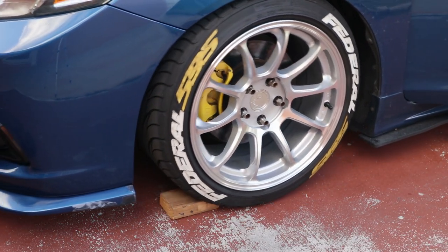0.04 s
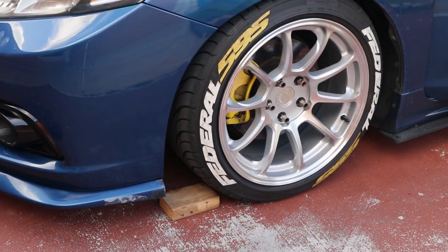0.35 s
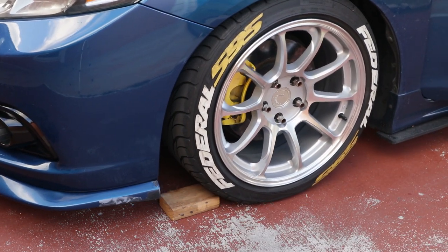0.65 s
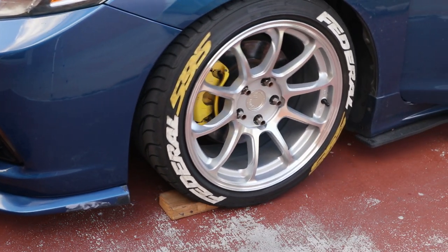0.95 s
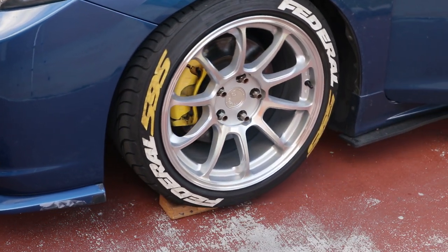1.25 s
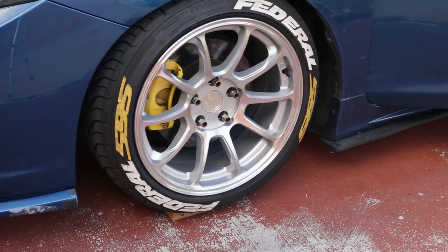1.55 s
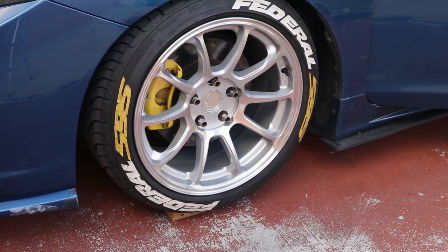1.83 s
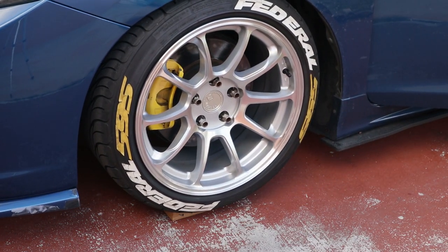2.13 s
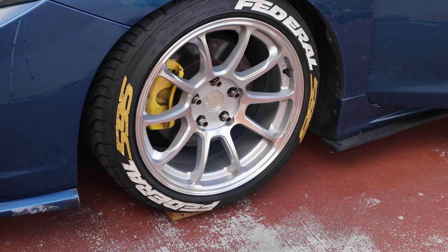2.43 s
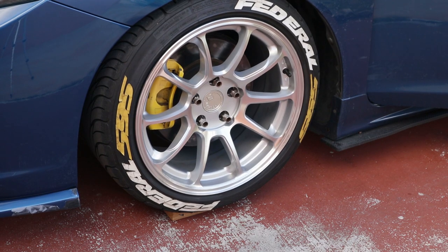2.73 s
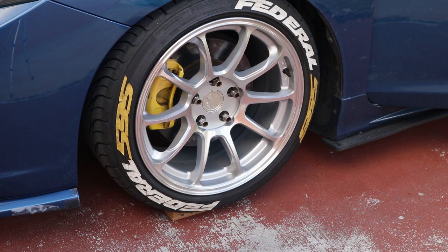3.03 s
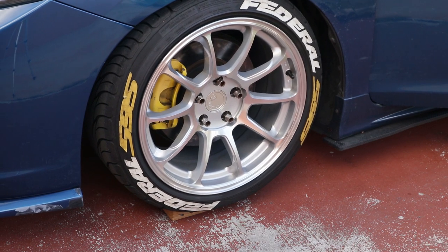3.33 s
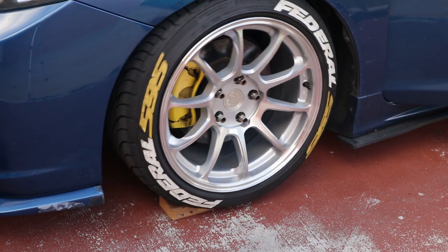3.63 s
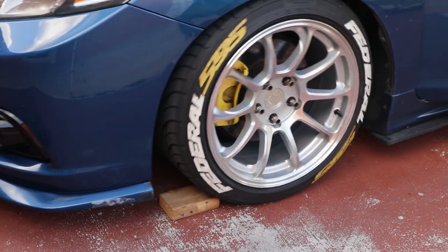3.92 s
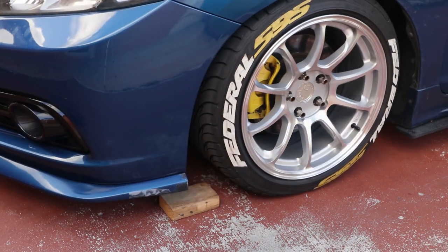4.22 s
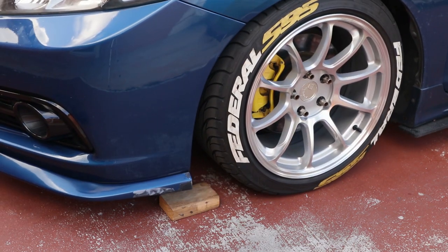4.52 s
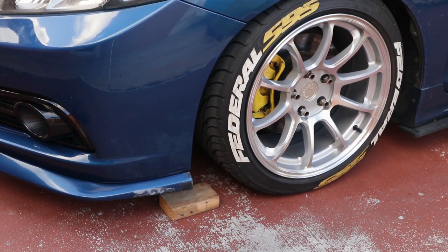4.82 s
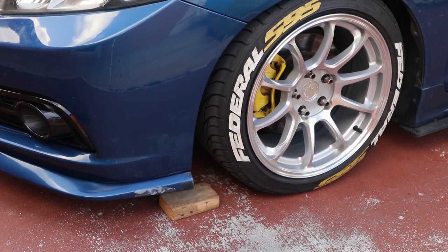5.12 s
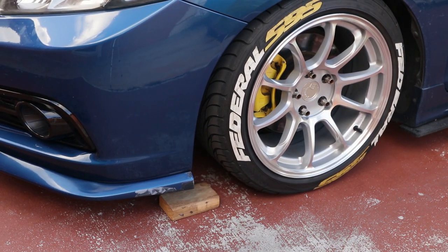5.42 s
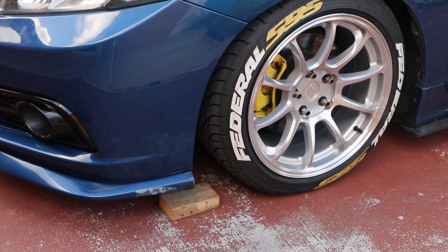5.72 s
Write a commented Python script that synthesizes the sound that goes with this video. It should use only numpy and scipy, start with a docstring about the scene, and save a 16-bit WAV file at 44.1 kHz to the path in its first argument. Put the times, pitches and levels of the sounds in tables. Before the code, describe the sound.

A four-cylinder car engine runs at low speed on a driveway, heard close up in stereo from beside the front wheel. It opens on a low exhaust drone. Three light throttle dabs follow at about 0.2, 0.8 and 1.2 seconds, each a short rise in pitch with an intake bark, led by a brief whistling hiss of air. From 1.5 to 2.5 seconds the engine labours as the clutch bites, with a deep drone and a faint growl. It sags to idle with heavy thuds around 2.6 seconds and goes quieter. At 3.5 seconds come another whistling hiss and more thuds, then a light rev peaking near 4 seconds. The pitch falls back, droning again from 4.6 seconds and thudding near 5, then settles into a softer idle hum until about 6 seconds. Valve gear, belts and alternator whirr faintly throughout.

```python
"""A four-cylinder car's exhaust, as the car is nudged to and fro on a driveway with dabs of throttle.
A stereo pair of microphones stands close by the front wheel. Firings ring the pipe, drone as the
clutch bites and thud as the speed sags to idle. Air hisses and whistles past the throttle plate and
the intake barks at the dabs. Behind it all, valve gear, belts and alternator whirr under the bonnet."""
import sys
import numpy as np
from scipy import signal
from scipy.fft import rfft, irfft, next_fast_len
from scipy.io import wavfile
from scipy.ndimage import uniform_filter1d

SR = 44100
rng = np.random.default_rng(int(sys.argv[2]) if len(sys.argv) > 2 else 0)


def transcribe(signal):
    """Save signal, clipped to [-1, 1], as a 16-bit WAV file at the path in sys.argv[1]."""
    frames = np.atleast_2d(signal).T
    limited = np.clip(frames, -1, 1)
    pcm = np.round(limited * 32767).astype(np.int16)
    wavfile.write(sys.argv[1], SR, pcm)


N = 254016
TIME = np.arange(N) / SR


def undb(db):
    """Decibels to gain."""
    return 10 ** (np.asarray(db) / 20)


def unit(x):
    """Scale to rms 1."""
    return x / np.sqrt(np.mean(x ** 2))


def colour(x, points, rolloff_db=18):
    """Causal filter through (f/Hz, level/dB) points, falling rolloff_db an octave above the last."""
    size = next_fast_len(N + SR // 2)
    hz, db = np.transpose(points)
    octave = np.log2(np.arange(size + 1) * SR / (2 * size) + 1)
    gain_db = np.interp(octave, np.log2(hz), db) - rolloff_db * np.maximum(octave - np.log2(hz[-1]), 0)
    # folding the cepstrum gives minimum phase
    cepstrum = irfft(np.log(undb(gain_db)))
    cepstrum[1:size] *= 2
    cepstrum[size + 1:] = 0
    return irfft(rfft(x, 2 * size) * np.exp(rfft(cepstrum)))[..., :N]


def walk(rate_hz):
    """Smooth random wander of rms 1."""
    step = int(SR / rate_hz)
    stairs = np.repeat(rng.standard_normal(N // step + 1), step)
    return unit(uniform_filter1d(uniform_filter1d(stairs, step), step)[:N])


def narrow_noise(hz, width_hz):
    """A narrow band of noise around a moving pitch."""
    turn = 2 * np.pi * np.cumsum(hz) / SR
    return unit(walk(2 * width_hz) * np.sin(turn) + walk(2 * width_hz) * np.cos(turn))


def band(x, lo_hz, hi_hz, order):
    """Band-pass without delay."""
    return signal.sosfiltfilt(signal.butter(order, [lo_hz, hi_hz], "band", fs=SR, output="sos"), x)


def air(direct):
    """Noise at the two microphones: a direct share in common, the rest scattered by ground and body."""
    return np.sqrt(direct) * rng.standard_normal(N) + np.sqrt(1 - direct) * rng.standard_normal((2, N))


def swell(start, rise, hold, decay):
    """Rise, hold, then die away; times in seconds."""
    attack = np.clip((TIME - start) / rise, 0, 1)
    return attack * np.exp(-np.maximum(TIME - start - rise - hold, 0) / decay)


def crank_mean(x, phase, cycles):
    """Running mean over a fixed crank angle, given in firing cycles."""
    total, index = np.cumsum(x), np.arange(N)
    early, late = (np.interp(phase + side * cycles / 2, phase, index) for side in (-1, 1))
    return (np.interp(late, index, total) - np.interp(early, index, total)) / (late - early)


def steady(x, phase, cycles=3):
    """Scale to rms 1 over a running window of a few firings."""
    return x / np.sqrt(np.abs(crank_mean(x ** 2, phase, cycles)) + 1e-18)


# the engine bay from beside the wheel: t/s, clatter level/dB, rush level/dB
BAY_LEVELS = [(0, -32.5, -41.5), (.45, -40, -54), (.65, -44, -54), (.85, -29.5, -50), (1.0, -42, -53),
              (1.24, -33.5, -46), (1.55, -38.5, -50), (2.0, -35, -47.5), (2.35, -37.5, -47.5),
              (2.52, -39.5, -54.5), (2.85, -39.5, -51.5), (3.57, -32.5, -44), (3.66, -40.5, -49.5),
              (3.92, -35.5, -46.5), (4.05, -41, -53.5), (5.0, -41, -53.5), (5.76, -33.5, -45.5)]
# clatter and rush as heard, with the treble cut off near 12 kHz: f/Hz, level/dB
CLATTER_SPECTRUM = [(30, -17), (120, 8.5), (330, 3), (500, -1.5), (700, -1.5), (900, -3.5), (1180, -7.5),
                    (1400, -10.5), (1800, -11), (2600, -19.5), (4200, -26), (5500, -40.5), (12000, -40.5)]
RUSH_SPECTRUM = [(600, -13.5), (1800, 1.5), (3200, -1), (4400, -2.5), (5400, -8), (8000, -11),
                 (11000, -13.5), (12200, -28.5), (13500, -36)]
# how well the alternator's housing radiates its whine: f/Hz, level/dB
ALTERNATOR_HOUSING = [(1150, 7), (1400, -1.5), (1720, -1), (2050, -4), (2700, -4), (3100, -8.5)]

def engine_bay(hz, phase, throb=0.041, whine_order=33, flutter_hz=120, overrun_hz_per_s=120):
    """Background, under the bonnet: valve gear clatters, fan and belts rush, the alternator whines."""
    times, *levels = np.transpose(BAY_LEVELS)
    clatter_db, rush_db = (np.interp(TIME, times, db) for db in levels)
    beat = 1 + throb * (np.cos(2 * np.pi * phase) + np.cos(4 * np.pi * phase))
    taps = air(direct=0.96) * beat * undb(-walk(500))
    clatter = unit(colour(taps, CLATTER_SPECTRUM, rolloff_db=88.5))
    rush = unit(colour(air(direct=0.2) * undb(1.2 * walk(760)), RUSH_SPECTRUM))
    # the belt flutters, which blurs the whine into a narrow band
    whine = colour(narrow_noise(whine_order * hz, flutter_hz), ALTERNATOR_HOUSING)
    # the whine stands out as the speed sags, and hides as it climbs
    overrun = np.clip(-np.gradient(hz) * SR / overrun_hz_per_s, -1, 1)
    whine *= undb(-5 + 1.5 * overrun)
    bay = clatter * undb(clatter_db + 1.5 * walk(25)) + (rush + whine) * undb(rush_db)
    return bay * undb([[.5], [-.5]])  # 1 dB louder at the left microphone


# air through the barely open throttle:
# t/s, rise/s, hold/s, decay/s, level/dB, whistle f/Hz, whistle sag/(Hz/s), whistle re hiss/dB
HISSES = [(0.051, 0.051, 0.071, 0.014, -40, 3110, 1640, 2),
          (0.668, 0.023, 0.021, 0.052, -40, 3150, 1200, -2),
          (1.105, 0.0059, 0.017, 0.031, -36, 3090, 1000, -4),
          (3.487, 0.056, 0.039, 0.013, -39.5, 3200, 300, 5.5),
          (3.747, 0.058, 0.023, 0.043, -51, 3160, 100.6, 6.5)]
# the hiss as heard, with the treble cut off near 12 kHz: f/Hz, level/dB
HISS_SPECTRUM = [(600, -17.5), (1500, 5.5), (2400, -5.5), (3200, 3.5), (4300, 2), (6000, -6), (8000, -6),
                 (11500, -11), (13000, -28), (16000, -39)]
# the inlet tract's modes: multiple of the whistle pitch, width/Hz, level/dB
INLET_MODES = [(1, 228.3, -1), (1.37, 362, -20.5)]
# squeals of the throttle gap, falling as it opens: t/s, length/s, from f/Hz, to f/Hz, level/dB
SQUEALS = [(0.077, 0.032, 12900, 11200, -42), (3.508, 0.088, 14900, 11500, -46.5)]

def throttle(squeal_width_hz=450):
    """Air hisses past the plate and excites the inlet's whistle and a thin falling squeal."""
    hiss = unit(colour(air(direct=0.82), HISS_SPECTRUM))
    out = np.zeros((2, N))
    for start, rise, hold, decay, db, hz, sag, whistle_db in HISSES:
        pitch = hz - sag * np.clip(TIME - start - rise, 0, hold + 2 * decay)
        whistle = sum(undb(mode_db) * narrow_noise(multiple * pitch, width)
                      for multiple, width, mode_db in INLET_MODES)
        out += undb(db) * swell(start, rise, hold, decay) * (hiss + undb(whistle_db) * whistle)
    for start, length, from_hz, to_hz, db in SQUEALS:
        progress = np.clip((TIME - start) / length, 0, 1)
        pitch = from_hz + (to_hz - from_hz) * progress
        out += undb(db) * np.sin(np.pi * progress) * narrow_noise(pitch, squeal_width_hz)
    return out


# the intake barks and growls under load: t/s, hold/s, decay/s, level/dB
BARKS = [(0.2, 0.065, 0.062, -27.5), (0.795, 0.051, 0.033, -26), (1.207, 0.027, 0.052, -27),
         (1.909, 0.25, .04, -43), (2.175, 0.29, 0.024, -39.5)]
# spectrum of the intake: f/Hz, level/dB
INTAKE_SPECTRUM = [(150, -39.5), (300, 14), (480, 2.5), (680, 9), (1000, -0.5), (1500, -13), (2300, -18),
                   (3500, -41), (8000, -30.5)]

def intake(pulses, phase, tone_db=-3):
    """With the throttle open every intake stroke gulps audibly: a pulse and a puff of turbulence."""
    opening = sum(undb(db) * swell(start, 0.0053, hold, decay) for start, hold, decay, db in BARKS)
    gulps = np.exp(-(phase % 1))
    puffs = unit(colour(air(direct=0.92) * gulps, INTAKE_SPECTRUM))
    tone = unit(colour(pulses, INTAKE_SPECTRUM))
    return opening * unit(puffs + undb(tone_db) * tone)


# moves of the pedal: t/s, glide/s, hold/s, target firing f/Hz, sag afterwards/(Hz/s)
PEDAL_MOVES = [(0.167, .2, 0.052, 85.27, 45.23), (.79, .17, .12, 84.86, 94.85),
               (1.21, .09, .1, 90.45, 65.69), (1.564, .26, .01, 73.05, 44.69),
               (3.648, 0.35, .12, 74.56, 47.93)]

def firing_rate(start_hz=64.62, idle_hz=38.95, hunt_hz=2.0, hunt_s=.9, settle_s=1.0, flywheel_s=0.042):
    """Firings per second: each pedal move glides to a target speed, holds and sags."""
    hz = np.full(N, start_hz)
    low_hz = idle_hz - hunt_hz
    for start, glide, hold, target_hz, sag in PEDAL_MOVES:
        release = start + glide + hold
        landing = release + (target_hz - low_hz) / sag
        move = np.interp(TIME, [start, start + glide, release, landing],
                         [np.interp(start, TIME, hz), target_hz, target_hz, low_hz])
        # the idle governor catches the falling speed late and swings
        age = np.maximum(TIME - landing, 0)
        idle = idle_hz - hunt_hz * np.cos(2 * np.pi * age / hunt_s) * np.exp(-age / settle_s)
        hz = np.select([TIME < start, TIME < landing], [hz, move], idle)
    return uniform_filter1d(hz, int(flywheel_s * SR))


# the engine off load: firing f/Hz, boom/dB, drone/dB, overtones/dB, rasp/dB, firing scatter/dB
COASTING = [(38.5, -38.5, -29, -30.5, -58, 2.0), (53.4, -47.5, -38.5, -39.5, -53, 1.4),
            (61.7, -25, -44, -38.5, -50, 1.4), (79.4, -27.5, -39, -48.5, -48.5, 0.47),
            (80.4, -32, -44, -37, -46.5, 1.13)]
# the exhaust barks as the throttle opens: t/s, hold/s, level/dB
SURGES = [(0.161, 0.073, -12.5), (0.782, 0.06, -13.5), (1.189, 0.074, -16), (3.728, 0.047, -12.5),
          (3.892, 0.14, -14.5)]
# the clutch bites and the engine labours: t/s, rise/s, hold/s, boom/dB, drone/dB, overtones/dB
CLUTCH_PULLS = [(0, 0.0033, 0.12, -22, -13, -24.5), (0.467, .13, 0.083, -32, -18.5, -32.5),
                (1.06, 0.098, 0.011, -20.5, -21, -31.5), (1.464, 0.14, 0.304, -23.5, -14.5, -27),
                (1.842, 0.08, 0.17, -18, -40, -23), (2.11, 0.11, 0.055, -16.5, -20, -16.5),
                (2.244, 0.16, 0.047, -40, -10.5, -19), (4.13, 0.084, 0.019, -31.5, -22.5, -34),
                (4.564, 0.095, 0.36, -31, -18, -24.5), (5.14, 0.25, 0.43, -37, -27, -37)]
# as the speed sags or idles, a few heavy firings thud: t/s, hold/s, level/dB
STUMBLES = [(0.732, 0.022, -18.5), (2.517, 0.17, -19), (2.645, .075, -14.5), (3.292, 0.25, -26),
            (3.527, 0.019, -12.5), (3.571, 0.05, -11.5), (3.676, 0.039, -12), (4.519, .025, -21),
            (4.939, 0.063, -17)]
# added to a surge's or a stumble's level: boom/dB, drone/dB, overtones/dB, rasp/dB
SURGE_MIX_DB = [-29, 2, -5.5, -29.5]
STUMBLE_MIX_DB = [-13.5, -0.5, -7.5, -26.5]

def engine_load(hz, pull_rasp_db=-15, stumble_scatter_db=0.1):
    """Load sets the gains of boom, drone, overtones and rasp, and how unevenly the cylinders fire."""
    speeds, *columns = np.transpose(COASTING)
    *coasting_db, scatter_db = [np.interp(hz, speeds, column) for column in columns]
    power = undb(coasting_db) ** 2
    for start, hold, db in SURGES:
        surge = swell(start, rise=0.014, hold=hold, decay=0.061)
        power += np.outer(undb(db) * undb(SURGE_MIX_DB), surge) ** 2
    for start, rise, hold, boom_db, drone_db, overtone_db in CLUTCH_PULLS:
        gains = undb([boom_db, drone_db, overtone_db, overtone_db + pull_rasp_db])
        power += np.outer(gains, swell(start, rise, hold, decay=0.067)) ** 2
    for start, hold, db in STUMBLES:
        thud = swell(start, rise=0.0073, hold=hold, decay=0.015)
        power += np.outer(undb(db) * undb(STUMBLE_MIX_DB), thud) ** 2
        scatter_db += stumble_scatter_db * thud
    return np.sqrt(power), scatter_db


# how far each of the four cylinders runs strong or weak: relative offset
CYLINDER_BIAS = [0.92, -0.31, -0.078, -1.3]

def firings(phase, scatter_db, cylinder_share=0.15, jitter_s_per_db=.00018):
    """One pulse per firing; cylinders differ, and the more uneven the burning, the less punctual."""
    at = np.flatnonzero(np.diff(np.floor(phase))) + 1
    size_chance, time_chance = rng.standard_normal((len(at), 2)).T
    bias = cylinder_share * np.resize(CYLINDER_BIAS, len(at))
    size = undb(scatter_db[at] * (size_chance + bias))
    late = (SR * jitter_s_per_db * scatter_db[at] * time_chance).astype(int)
    return np.bincount(np.clip(at + late, 0, N - 1), size, N)


def underbody_echoes(x, t60_s=0.15):
    """Add dense short echoes between the underbody and the driveway."""
    age = TIME[:SR // 8]
    tail = rng.standard_normal(len(age)) * undb(-60 * age / t60_s)
    return x + signal.fftconvolve(x, tail / np.linalg.norm(tail))[:N]


# resonances of the exhaust pipe, from beside the front wheel: f/Hz, level/dB
PIPE_RESPONSE = [(25, -1), (45, -23), (65, -7), (80, -10.5), (96, -25.5), (116, 4), (143, 9), (166, -1.5),
                 (200, 9.5), (222, 4), (242, -7), (265, 1.5), (320, -13.5), (500, -51.5)]
# ring of the pipe wall under sharp pulses: f/Hz, level/dB
PIPE_WALL = [(220, -42), (320, 13.5), (400, -0.5), (470, 1.5), (540, -8), (610, -4), (850, -11.5),
             (1100, -32.5), (2200, -45)]

def exhaust(pulses, phase, gains, blowdown_cycles=0.12):
    """Main source: firings ring the pipe in boom, drone and overtones, and make its wall rasp."""
    # a cylinder empties over a fixed crank angle, so slow firings are soft and round
    gas = crank_mean(crank_mean(pulses, phase, blowdown_cycles), phase, blowdown_cycles)
    pipe = colour(gas, PIPE_RESPONSE)
    boom = band(pipe, 39, 110.6, order=6)
    drone = band(pipe, 98, 178.8, order=4)
    overtones = band(pipe, 201.3, 720, order=6)
    rasp = colour(underbody_echoes(pulses), PIPE_WALL)
    return sum(gain * steady(part, phase) for gain, part in zip(gains, (boom, drone, overtones, rasp)))


def scene():
    """The car close up: exhaust, intake and engine bay follow one crankshaft; the throttle hisses."""
    hz = firing_rate()
    phase = np.cumsum(hz) / SR + .9  # in firing cycles
    gains, scatter_db = engine_load(hz)
    pulses = firings(phase, scatter_db)
    return exhaust(pulses, phase, gains) + intake(pulses, phase) + throttle() + engine_bay(hz, phase)


def record(dry, left_lead_s=.000023, top_hz=15200):
    """The pair by the front wheel: sound reaches the left microphone first; the top treble is cut."""
    hz = np.arange(N // 2 + 1) * SR / N
    right = irfft(rfft(dry[1]) * np.exp(-2j * np.pi * hz * left_lead_s), N)
    lowpass = signal.ellip(8, .2, 70, top_hz, fs=SR, output="sos")
    return signal.sosfilt(lowpass, np.array([dry[0], right]))


dry = scene()
out = record(dry)
transcribe(out)
```